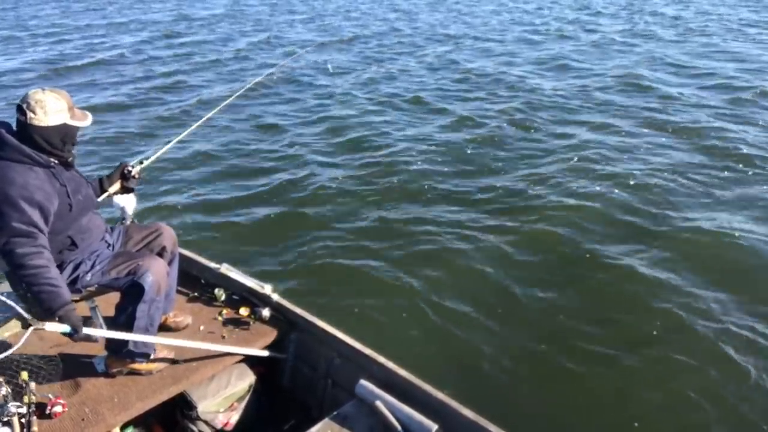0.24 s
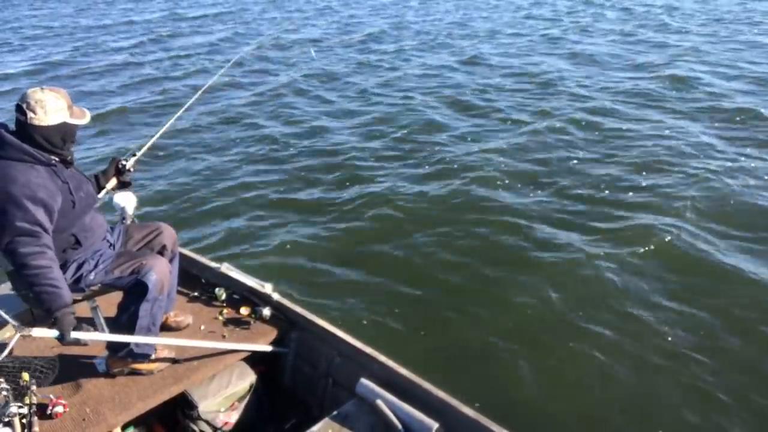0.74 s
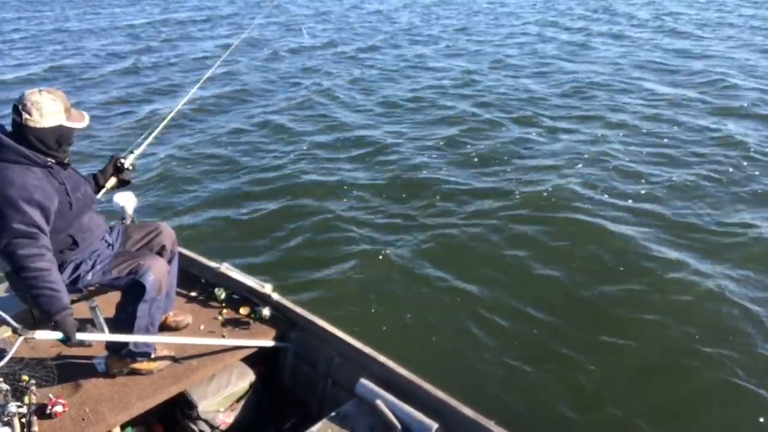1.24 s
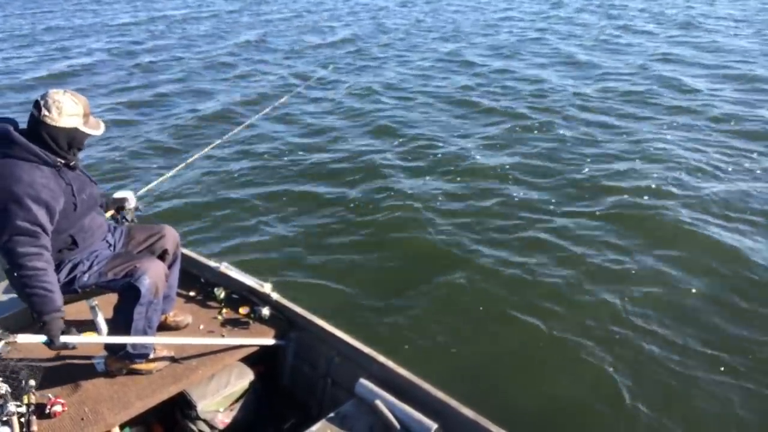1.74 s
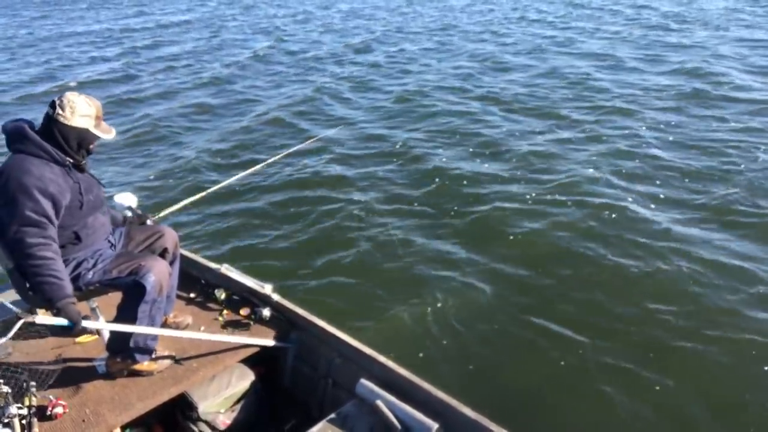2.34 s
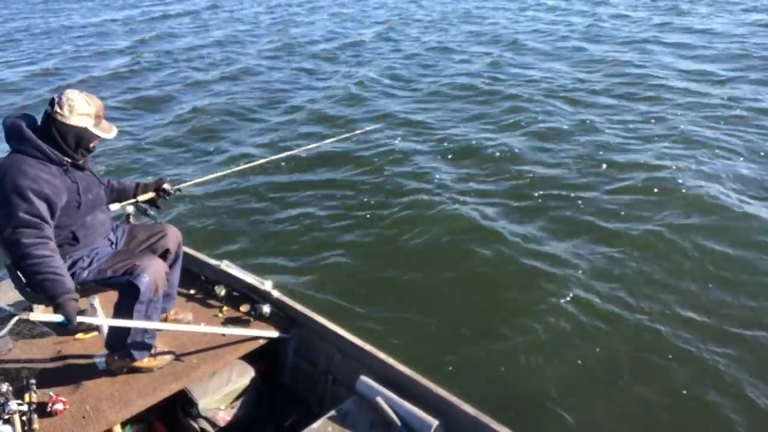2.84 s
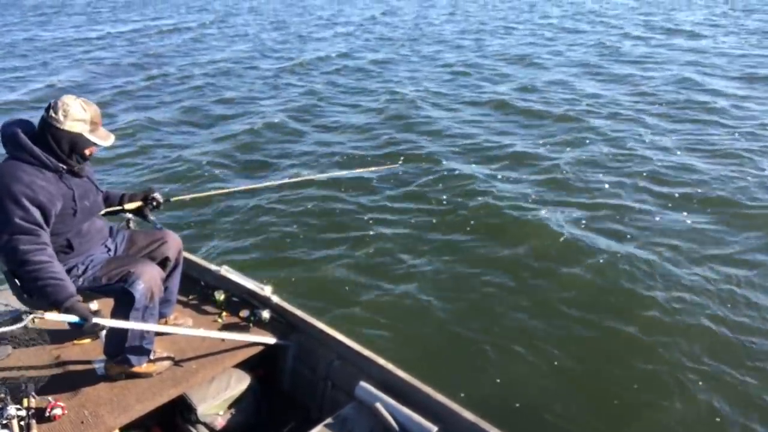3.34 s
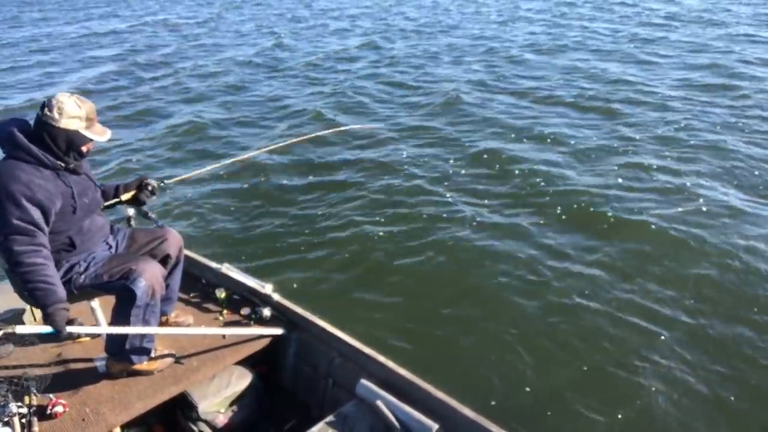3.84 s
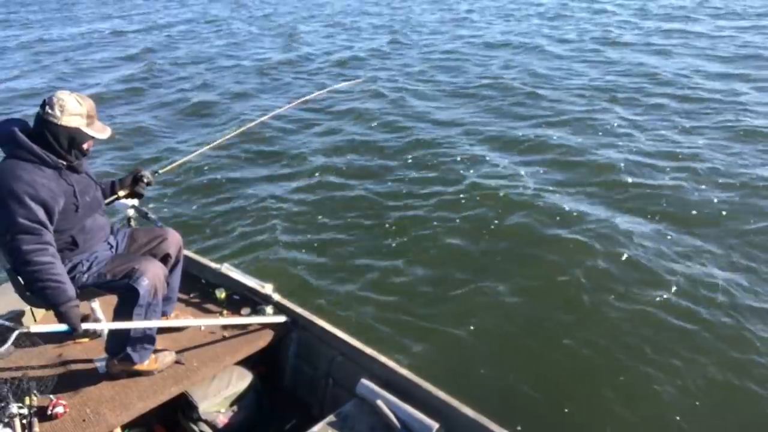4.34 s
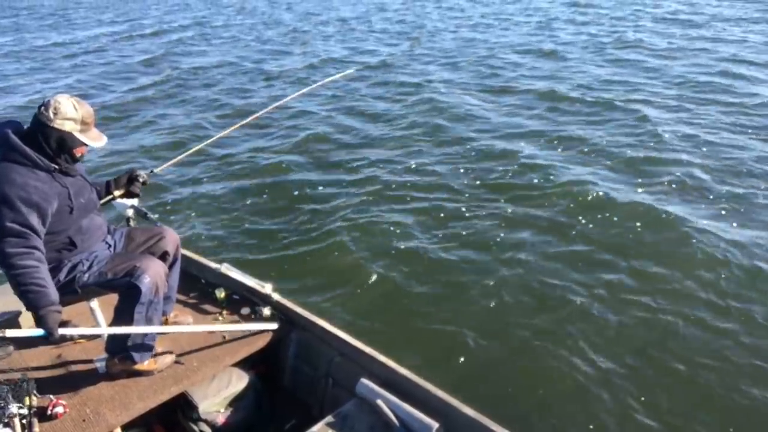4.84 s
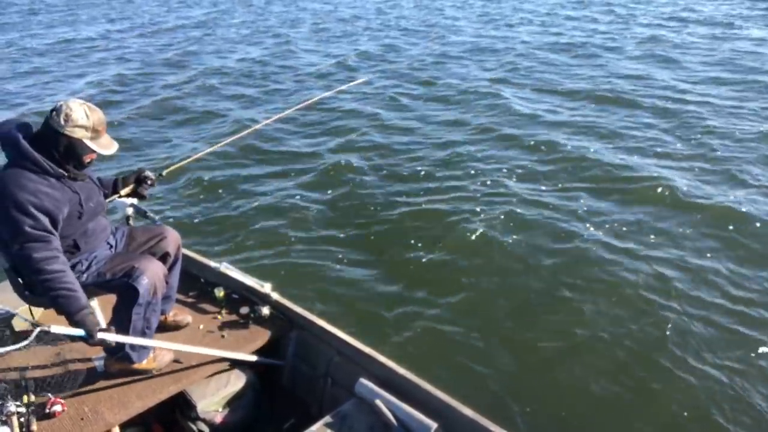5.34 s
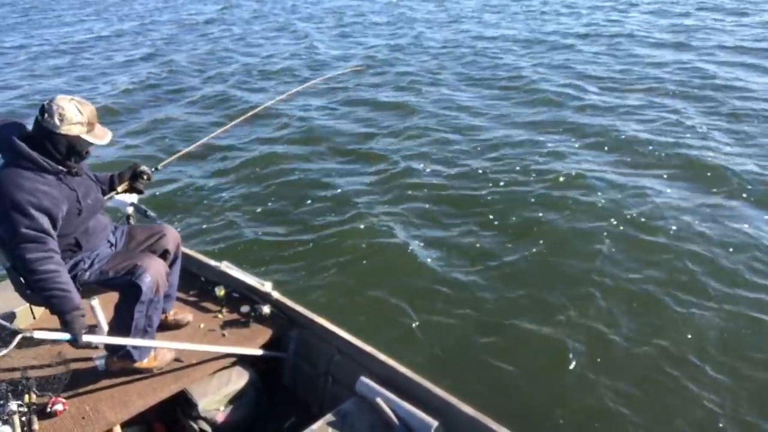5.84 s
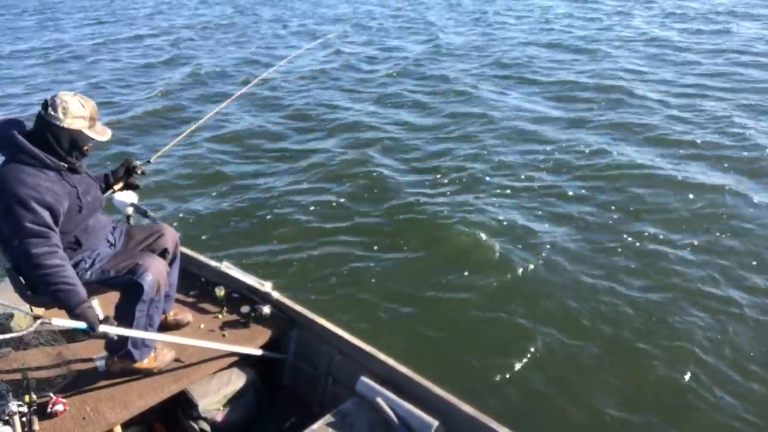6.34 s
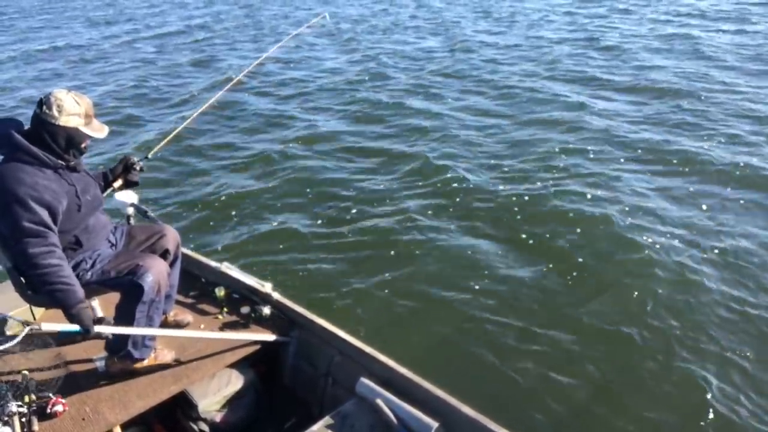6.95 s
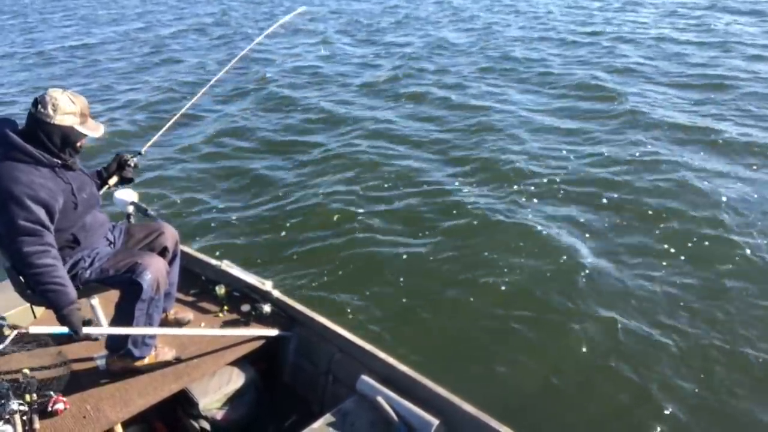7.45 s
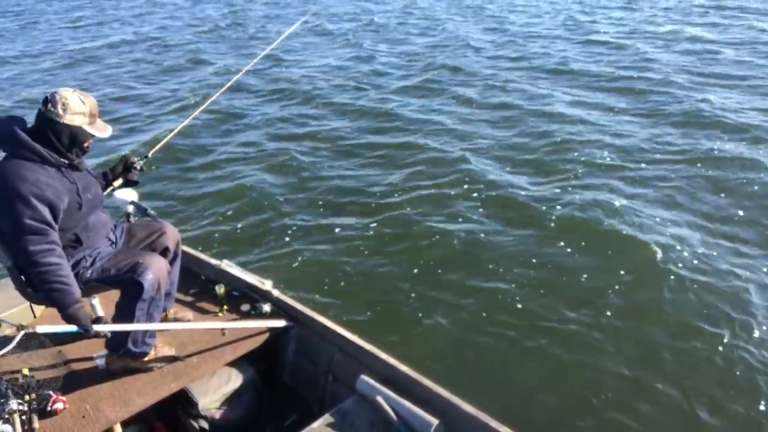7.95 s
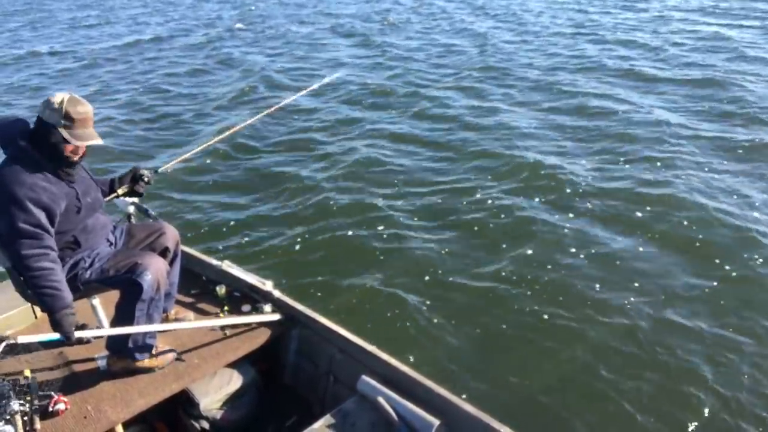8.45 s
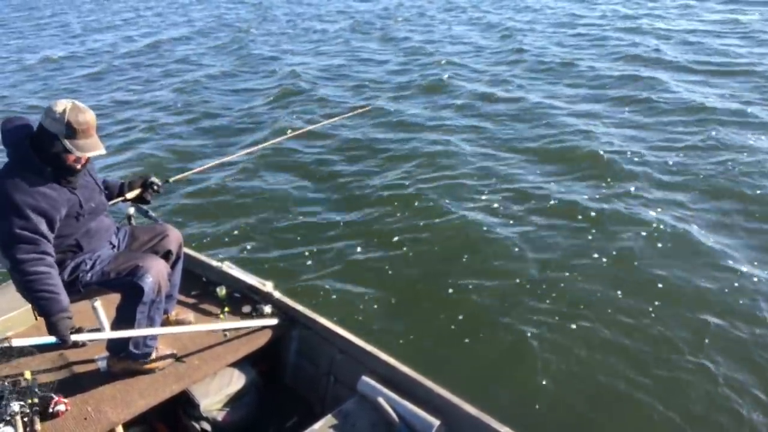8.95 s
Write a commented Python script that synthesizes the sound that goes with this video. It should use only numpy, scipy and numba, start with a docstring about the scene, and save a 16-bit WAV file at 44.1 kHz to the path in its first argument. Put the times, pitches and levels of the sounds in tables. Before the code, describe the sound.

A pole knocks hard on an aluminum boat hull about three times a second, with brief scraping, over faint water and wind.

```python
"""Hard knocks on an aluminium hull, close up, about three a second: each cracks, clangs and booms.
An angler in a small boat on a choppy lake is jabbing a long pole against the plates;
the pole grazes, rebounds and now and then skids and rattles. Underneath, water laps at the boat
and light wind rumbles on the microphone of a nearby phone, whose limiter flattens the blows."""
import sys
import numpy as np
from scipy import signal
from scipy.fft import rfft, irfft, next_fast_len
from scipy.io import wavfile
from scipy.ndimage import uniform_filter1d, minimum_filter1d
from numba import njit

SR = 44100
rng = np.random.default_rng(int(sys.argv[2]) if len(sys.argv) > 2 else 0)


def to_wav(sig):
    """Store sig (one row per channel, or 1-D mono) as 16-bit WAV at the path in sys.argv[1].

    Samples outside -1..1 are clipped; the rate is SR.
    """
    pcm = np.clip(np.atleast_2d(sig), -1, 1) * 32767
    pcm = np.round(pcm).astype(np.int16)
    wavfile.write(sys.argv[1], SR, pcm.T)  # frames by channels


N = 404838
TIME = np.arange(N) / SR

# Blows of the pole: a deep one lands on slack plate, a hard one cracks brighter, the tip may graze first.
# t/s, force/dB, depth/dB, hardness/(dB per octave), lead of the graze/s (0 for none)
KNOCKS = [(0.069, 1.5, -13, 0.5, 0), (0.4071, 0.5, -2.5, 4, 0.00084), (0.7267, 0.5, -3.5, 3.5, 0.00096),
          (1.042, .5, -4.5, 1.5, 0.00035), (1.3893, 1, 2, 2.5, 0.00067), (1.7625, 1.5, 1.5, 1, 0.0015),
          (2.124, 2, 2, -0.5, 0.0014), (2.4466, 2, 3.5, -3.5, 0.0025), (2.8311, 0.5, -1, -1.5, .003),
          (3.1912, 3, -0.5, -1, 0.0097), (3.525, 0.5, 3.5, -2, 0.0021), (3.8984, -1.5, 13.5, 0.5, .026),
          (5.1586, 2.5, -3.5, -1, 0.0031), (5.5238, -1, -10.5, -1.5, 0.00039), (5.8474, 0, -3, -3, 0),
          (6.1869, -1.5, -11, -3.5, 0.00011), (6.5221, 1, -2, 2.5, 0), (6.8593, 1, 5.5, -2, .005),
          (7.1986, 0.5, 1, -2.5, .006), (7.5333, -0.5, -0.5, -2, .0145), (7.841, -2.5, 13, 0, 0.0018)]


def knocks(dent_hz=560, likeness=0.64, size=16384):
    """Hard blows close by: the plate dents and springs back, then dense modes and the boom ring on."""
    clang_spectrum = [(45, -35.5), (150, -11.5), (400, 1.5), (800, 0), (1100, 2), (1300, 2.5), (1550, 0),
                      (1830, -9.5), (2100, -4.5), (3200, -8.5), (4500, -19.5), (9000, -35)]  # dense plate modes: f/Hz, level/dB
    crack_spectrum = [(1500, -13.5), (3500, -2), (4600, 1), (5400, -0.5), (7500, -1), (8400, -5.5),
                      (10800, -2), (14000, -12), (18000, -25)]  # the contact itself: f/Hz, level/dB
    out, t = np.zeros(N), np.arange(size) / SR
    same_plate = rng.standard_normal(size)
    for s, force, depth, hardness, _ in KNOCKS:
        modes = likeness * same_plate + np.sqrt(1 - likeness ** 2) * rng.standard_normal(size)
        clang = undb(force - 12.5 + 0.16 * depth) * colour(modes, clang_spectrum)
        clang *= 1 + undb(4) * np.exp(-(t / 0.0031) ** 2)  # strongest while the pole is in contact
        tilted = [(hz, db + hardness * np.log2(hz)) for hz, db in crack_spectrum]
        crack = undb(force - 18.5 + 0.086 * depth) * colour(modes, tilted)
        crack *= 1 + 5 * np.exp(-(t / 0.0018) ** 2)
        ring = ring_down(clang + crack, t) * (1 - np.exp(-t / 0.0015))
        boom_db = force - 11.5 - 0.32 * depth
        dent = np.sin(2 * np.pi * dent_hz * (t - 0.003)) * np.exp(-((t - 0.003) / 0.00059) ** 2)
        low_modes = boom(t, boom_db, thump_db=force - 20 + 0.89 * depth)
        add(out, s, ring + undb(boom_db + 9) * dent + low_modes)
    return out


def boom(t, boom_db, thump_db, scatter_db=0.65, detune=0.0064, swell_s=0.011):
    """The low hull modes; each blow lands a little elsewhere, and the motion takes a moment to spread."""
    hull_modes = [(178.8, 1.5, 0.19), (252.6, -10.5, 0.28), (284.9, -8, 0.28), (358.2, -1.5, 0.23),
                  (373.2, -11, .16), (405.4, -2.5, 0.14), (453.4, 3.5, 0.14), (474, -1, .15),
                  (533, -4, .17), (559, -4.5, 0.18), (634, -9.5, 0.2), (720.5, -2, 0.12),
                  (957, -17.5, 0.22)]  # the first is the deep thump: f/Hz, relative level/dB, t60/s
    hz, db, t60 = np.transpose(hull_modes)[:, :, None]
    order = np.arange(len(hull_modes))[:, None]
    loud, shift, phase = rng.standard_normal((3, len(hull_modes), 1))
    turns = hz * (1 + detune * shift) * t + order / 2 + 0.17 * phase
    gain = undb(db + np.where(order == 0, thump_db, boom_db) + scatter_db * loud)
    return np.sum(gain * fade(t, t60) * np.sin(2 * np.pi * turns), axis=0) * (1 - np.exp(-t / swell_s))


def ring_down(x, t, lowest_hz=125, octaves=8):
    """Each octave of x dies away at the ring time of the plates."""
    ring_times = [(200, 0.65), (600, 0.14), (1300, 0.12), (3000, 0.084), (6000, 0.099), (14000, 0.062)]  # decay of the plates: f/Hz, t60/s
    hz, spectrum = np.fft.rfftfreq(len(x), 1 / SR), rfft(x)
    octave = np.clip(np.log2((hz + 1) / lowest_hz), 0, octaves - 1)
    bands = [irfft(spectrum * np.maximum(1 - abs(octave - k), 0), len(x)) for k in range(octaves)]
    return sum(band * fade(t, read(ring_times, lowest_hz * 2 ** k)) for k, band in enumerate(bands))


def plates(x, lag_s=0.0013):
    """Bending waves run faster at high pitch (lag_s is the delay at 1 kHz) and ring the thin plates."""
    resonances = [(1237, 63, 3), (1612, 17, 1), (2637, 38, -4), (3860, 14, -3.5), (4520, 44, -0.5),
                  (6480, 33, -8)]  # narrow plate peaks: f/Hz, width/Hz, level/dB
    size = next_fast_len(N + SR, real=True)
    hz = np.fft.rfftfreq(size, 1 / SR)
    rings = 1 + sum(undb(db) / (1 + 2j * (hz - centre) / width) for centre, width, db in resonances)
    travel = np.exp(-4j * np.pi * lag_s * np.sqrt(1000 * hz))
    return irfft(rfft(x, size) * rings * travel, size)[:N]


def light_contacts(graze_db=-19.5, pole_tick_db=-19, reel_tick_db=-18):
    """Grazes, rebounds and even ticks: t/s, level/dB, treble tick relative to the clack/dB."""
    rebounds = [(2.587, -24), (2.935, -22), (3.281, -18.5), (3.612, -28.5), (4.097, -30.5), (4.402, -33),
                (5.259, -23.5), (6.96, -26), (7.303, -18.5), (7.631, -21), (8.329, -31.5), (8.753, -25)]  # the pole falling back on the hull: t/s, level/dB
    tick_runs = [(4.7765, .2, -51.5), (8.883, .2, -44.5)]  # faint ticking, probably the reel: t/s, length/s, level/dB
    grazes = [(s - lead, graze_db) for s, *_, lead in KNOCKS if lead > 0]
    ticks = repeats(tick_runs, gap_s=0.066, jitter_s=0.00042, scatter_db=0)
    pole = [(s, db, pole_tick_db) for s, db in grazes + rebounds]
    return pole + [(s, db, reel_tick_db) for s, db in ticks]


def taps(gain_db=-1, size=6000):
    """Light contacts: a small snap and a short ring of the plates."""
    clack_spectrum = [(200, -23.5), (500, -7.5), (900, 6), (1350, 9.5), (2300, 11), (4000, 3.5),
                      (5300, -15.5), (7000, -11.5), (14000, -21)]  # body of a tap: f/Hz, level/dB
    tick_spectrum = [(1500, -99), (4500, 50), (7000, 2), (12000, 9), (17000, -23)]  # its treble edge: f/Hz, level/dB
    out, t = np.zeros(N), np.arange(size) / SR
    for s, db, tick_db in light_contacts():
        push = rng.standard_normal(size)
        push[16] += 10  # the snap
        clack = colour(push, clack_spectrum) * (fade(t, 0.04) + 0.074 * fade(t, 0.17))
        tick = colour(push, tick_spectrum) * (fade(t, 0.045) + 0.15 * fade(t, 0.11))
        add(out, s, undb(db + gain_db) * (clack + undb(tick_db) * tick))
    return out


def sliding_contacts(graze_db=-29, bounce_t60=0.091):
    """Skids, the grazes before them and rattling bounces: t/s, grating/dB, rasp/dB, t60/s."""
    slides = [(2.166, -33, 0.12, 0), (3.243, -41, .08, 0.035), (3.952, -42.5, 0.14, 0.00017),
              (4.215, -24.5, 0.3, 0.017), (4.255, -21.5, 0.091, 0.0029), (7.875, -37.5, 0.22, 0.0082),
              (8.138, -19.5, 0.16, .013), (8.175, -25.5, .15, 0.00083), (8.558, -27, 0.24, 0.019)]  # the tip skidding: t/s, level/dB, t60/s, lead of the graze/s (0 for none)
    rattles = [(2.047, .05, -51.5), (4.007, .05, -44), (4.369, .087, -37.5), (4.556, .015, -52.5),
               (4.631, .03, -48.5), (8.259, .125, -43.5), (8.43, .03, -53.5), (8.688, .05, -35.5),
               (8.817, .015, -41.5)]  # the loose pole chattering on the hull: t/s, length/s, level/dB
    grazes = [(s - lead, graze_db) for s, *_, lead in slides if lead > 0]
    chatter = repeats(rattles, gap_s=0.017, jitter_s=0.001, scatter_db=3)
    bounces = [(s, db - 2, db, bounce_t60) for s, db in grazes + chatter]
    return [(s, db + 2.5, db, t60) for s, db, t60, _ in slides] + bounces


def skids(slips_per_s=480, spread_db=6, grate_gain_db=3, rasp_gain_db=1, size=12000):
    """The tip catches, then sticks and slips ever more weakly; each slip rings the plate briefly."""
    grate_spectrum = [(60, -38.5), (330, -0.5), (600, -2.5), (820, 1.5), (1050, -4.5), (1400, -5.5),
                      (1850, -7.5), (2500, -8), (4000, -14.5), (8000, -34)]  # low grating of the plate: f/Hz, level/dB
    rasp_spectrum = [(1500, -20), (3900, 6), (5500, 0.5), (7200, 2.5), (8500, -7), (12000, -8),
                     (17000, -37)]  # high rasp of the slips: f/Hz, level/dB
    out, t = np.zeros(N), np.arange(size) / SR
    for s, grate_db, rasp_db, t60 in sliding_contacts():
        slips = (rng.random(size) < slips_per_s / SR) * undb(spread_db * rng.standard_normal(size))
        slips *= rng.choice([-1, 1], size)
        slips[0] = 3.07  # the first catch
        noise = rng.standard_normal(size)
        grate = unit(signal.fftconvolve(slips, colour(noise, grate_spectrum) * fade(t, 0.35))[:size])
        rasp = unit(signal.fftconvolve(slips, colour(noise, rasp_spectrum) * fade(t, 0.018))[:size])
        scrape = undb(grate_db + grate_gain_db) * grate + undb(rasp_db + rasp_gain_db) * rasp
        add(out, s, scrape * fade(t, t60))
    return out


def pole_ring(ring_hz=3445, beat_hz=24, t60=0.66, level_db=-52, size=16384):
    """After each knock the metal pole sings on thinly, in two close modes that beat."""
    out, t = np.zeros(N), np.arange(size) / SR
    for s, *_ in KNOCKS:
        lower = np.sin(2 * np.pi * ring_hz * t)
        upper = 0.45 * rng.standard_normal() * np.sin(2 * np.pi * (ring_hz + beat_hz) * t)
        add(out, s, (lower + upper) * fade(t, t60) * undb(level_db))
    return out


def laps(bubbles=14, spread_s=0.045):
    """Wavelets plop against the side of the boat, each trapping a cluster of bubbles of mixed sizes."""
    wavelets = [(.3, 259, -26), (.31, 1170, -33), (2.66, 1679, -34), (5.811, 1100, -29),
                (6.355, 696, -29.5)]  # plops at the hull: t/s, centre f/Hz, top bubble level/dB
    out = np.zeros(N)
    for s, hz, db in wavelets:
        for delay, pitch, weakness in rng.random((bubbles, 3)):
            plop = bubble(hz * 2 ** (1.2 * (pitch - 0.5)))
            add(out, s + spread_s * delay, plop * undb(db - 16 * weakness))
    return out


def bubble(hz, size=4000):
    """A trapped bubble's note rises as it nears the surface."""
    t, life = np.arange(size) / SR, 32 / hz
    return np.sin(2 * np.pi * hz * t * (1 + 0.12 * t / life)) * fade(t, life) * (1 - np.exp(-t * hz / 2))


def wind(gain_db=5, flutter_db=2):
    """Light gusts rumble on the microphone."""
    rumble_spectrum = [(15, -46), (28, -28.5), (42, -0.5), (65, 6.5), (100, 6.5), (160, -1.5), (300, -20.5),
                       (700, -49)]  # wind noise: f/Hz, level/dB
    gusts = [(0.0, -46.5), (0.12, -47.5), (1.87, -49.5), (4.17, -45), (4.32, -50), (6.9, -43), (9.18, -54)]  # rise and fall of the rumble: t/s, level/dB
    rumble = colour(rng.standard_normal(N), rumble_spectrum)
    return rumble * undb(np.interp(TIME, *np.transpose(gusts)) + gain_db + flutter_db * walk(10))


def lake(gain_db=5.5, slosh_db=-8, spray_db=-13, bubbles=220):
    """Far waves wash evenly; near ones slosh, shed droplets and trap small bubbles."""
    wash_spectrum = [(30, -25), (100, -8.5), (250, -6.5), (600, -5.5), (1200, -11.5), (2200, -23),
                     (4000, -23.5), (7000, -33), (11000, -42.5), (17000, -60.5)]  # distant waves: f/Hz, level/dB
    swells = [(0.0, -54.5), (0.54, -62), (1.38, -61), (2.79, -55.5), (2.94, -58), (3.91, -57), (4.17, -54),
              (4.83, -59), (6.49, -58.5), (6.65, -59.5), (7.7, -60), (8.1, -53.5), (8.64, -59.5),
              (9.18, -56)]  # rise and fall of the water: t/s, level/dB
    chop = undb(1.2 * walk(39))
    slosh = colour(rng.standard_normal(N),
                   [(90, -10.5), (250, 10.5), (700, 1), (1400, -19.5), (4000, -26.5)])
    droplets = (rng.random(N) < 400 / SR) * rng.standard_normal(N) * rng.random(N)
    spray = colour(droplets, [(600, -10), (1800, 2), (6000, -8), (16000, -27.5)])
    wash = colour(rng.standard_normal(N), wash_spectrum)
    water = wash + chop * (undb(slosh_db) * slosh + undb(spray_db) * spray)
    for when, pitch, strength in rng.random((bubbles, 3)):
        bubble_db = 10 * strength ** 2 - 9 * pitch - 1
        add(water, when * N / SR, bubble(350 * 2 ** (3.2 * pitch)) * undb(bubble_db))
    return water * undb(np.interp(TIME, *np.transpose(swells)) + gain_db)


def repeats(runs, gap_s, jitter_s, scatter_db, count=12):
    """Turn runs (t/s, length/s, level/dB) into slightly uneven contacts (t/s, level/dB)."""
    chance = rng.standard_normal((len(runs), count, 2))
    return [(start + k * gap_s + jitter_s * late, db + scatter_db * loud)
            for (start, length, db), draws in zip(runs, chance)
            for k, (late, loud) in enumerate(draws) if k * gap_s < length]


def undb(db):
    """Decibels to gain."""
    return 10 ** (np.asarray(db) / 20)


def unit(x):
    """Scale to rms 1."""
    return x / np.sqrt(np.mean(x ** 2))


def read(points, hz):
    """Read (f/Hz, value) points on a log-frequency axis."""
    f, value = np.transpose(points)
    return np.interp(np.log(hz + 1), np.log(f), value)


def colour(x, points):
    """Give x a spectrum (f/Hz, level/dB), at rms 1."""
    return unit(irfft(rfft(x) * undb(read(points, np.fft.rfftfreq(len(x), 1 / SR))), len(x)))


def fade(t, t60):
    """Exponential ring-down."""
    return np.exp(-np.log(1000) * t / t60)


def walk(rate_hz):
    """Smooth random drift, at rms 1."""
    hold = int(SR / rate_hz)
    steps = np.repeat(rng.standard_normal(N // hold + 1), hold)
    return unit(uniform_filter1d(uniform_filter1d(steps, hold), hold)[:N])


def add(out, s, x):
    """Mix x into out at time s."""
    i = max(int(s * SR), 0)
    out[i:i + len(x)] += x[:max(N - i, 0)]


def scene():
    """One microphone near the boat: the contacts sound through the plates, over wind and water."""
    hull = plates(knocks() + taps() + skids())
    return (hull + pole_ring() + laps() + wind() + lake())[None]


@njit
def follow(x, release):
    """Peak follower: jumps up at once and sinks slowly."""
    out, peak = np.empty(len(x)), 0.
    for i in range(len(x)):
        peak = max(x[i], peak * release)
        out[i] = peak
    return out


def record(dry, limit=1.1, release_s=0.008, window=35, top_hz=17600):
    """The phone's look-ahead limiter holds the blows down, their tips round off, and the top is cut."""
    peak = follow(np.abs(dry[0]), np.exp(-1 / (release_s * SR)))
    gain = limit / np.maximum(peak, limit)
    limited = dry * uniform_filter1d(minimum_filter1d(gain, window), window)
    rounded = limited / (1 + limited ** 8) ** (1 / 8)
    return signal.sosfilt(signal.ellip(8, 0.2, 70, top_hz, fs=SR, output="sos"), rounded)


dry = scene()
out = record(dry)
to_wav(out)
```